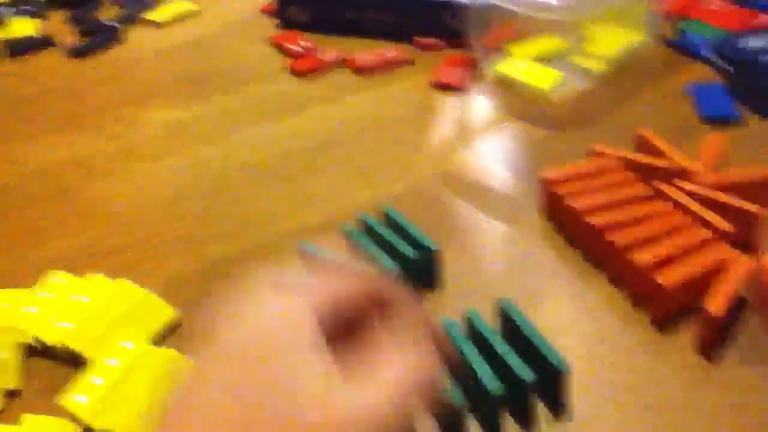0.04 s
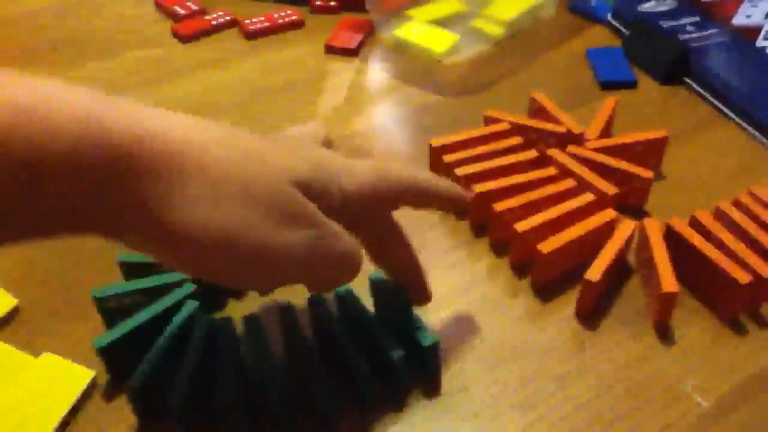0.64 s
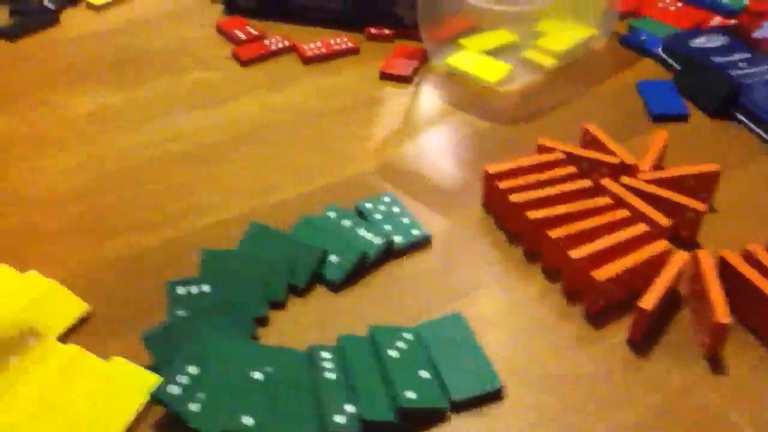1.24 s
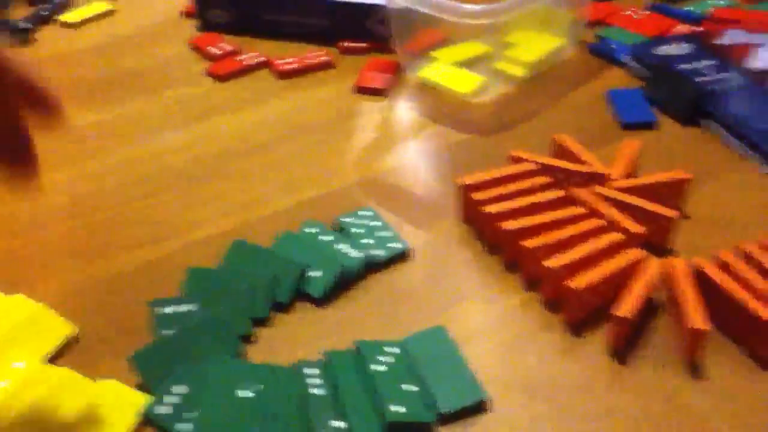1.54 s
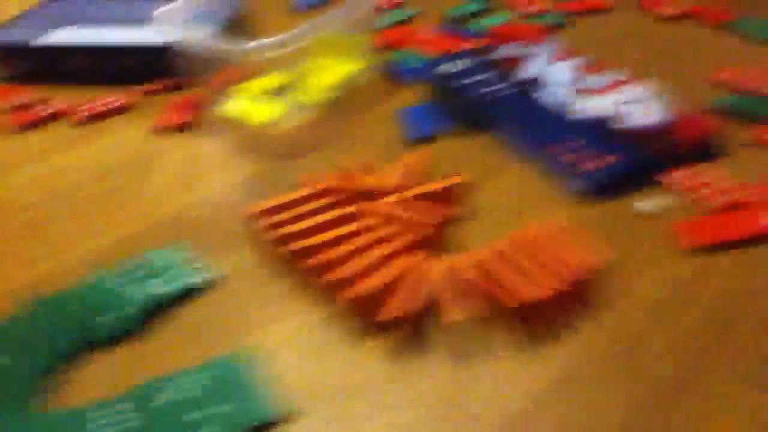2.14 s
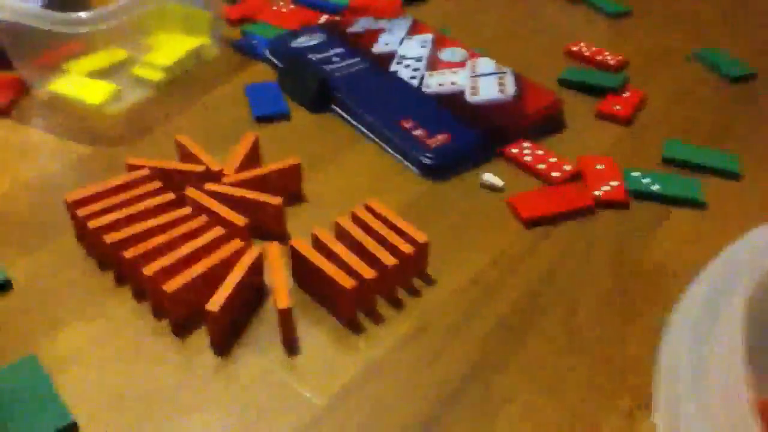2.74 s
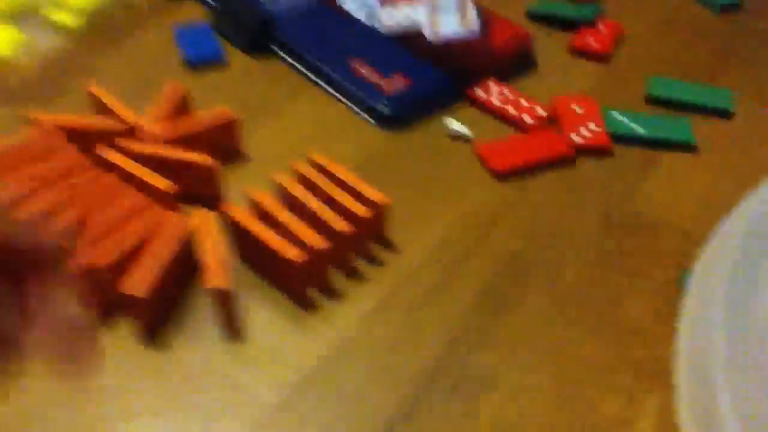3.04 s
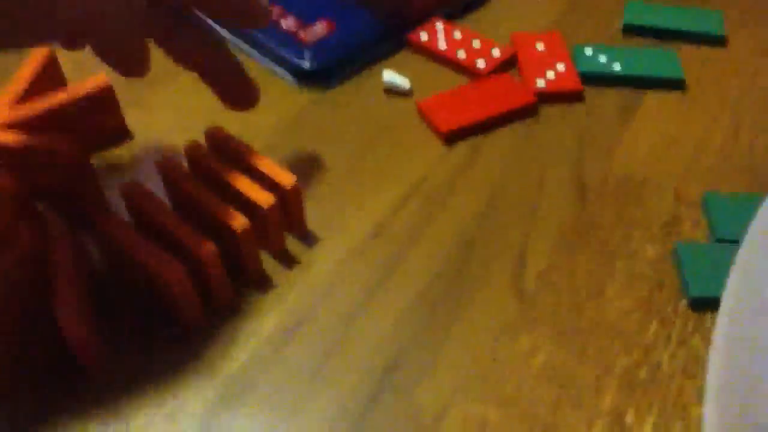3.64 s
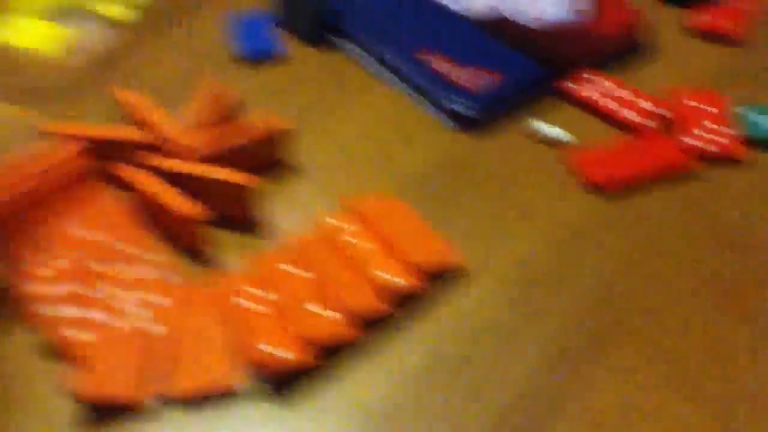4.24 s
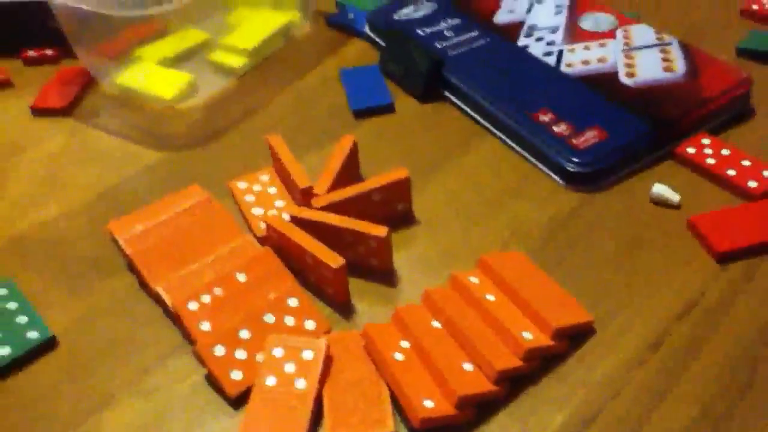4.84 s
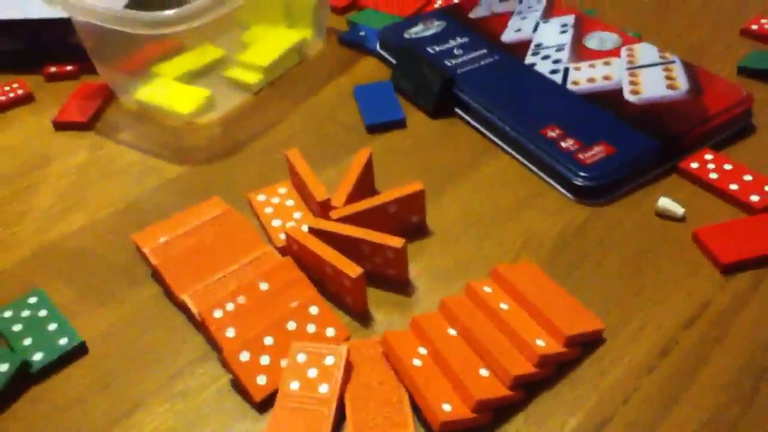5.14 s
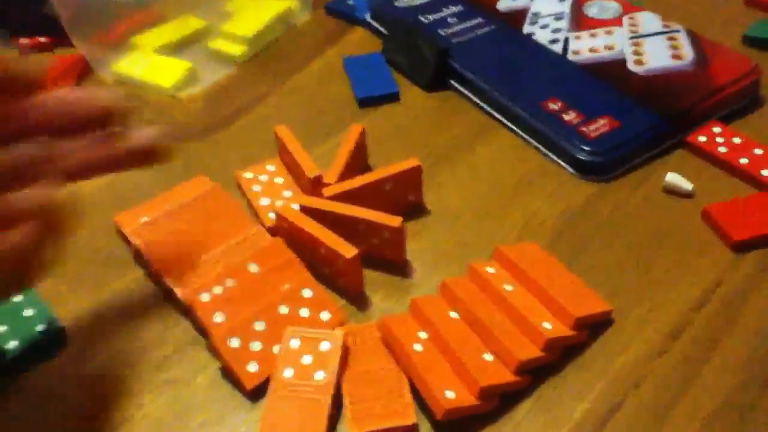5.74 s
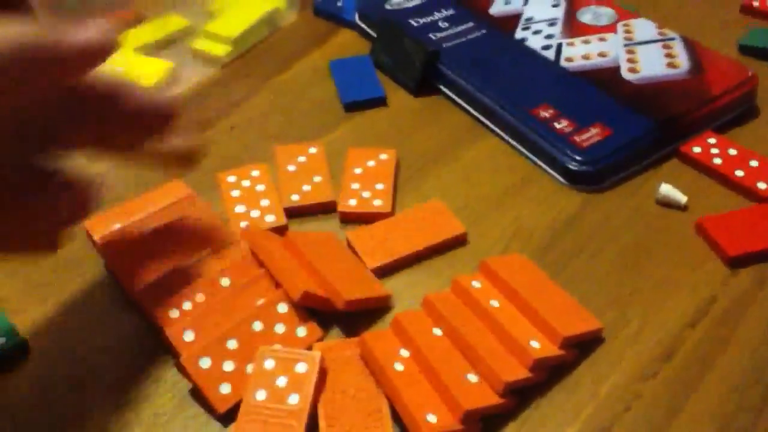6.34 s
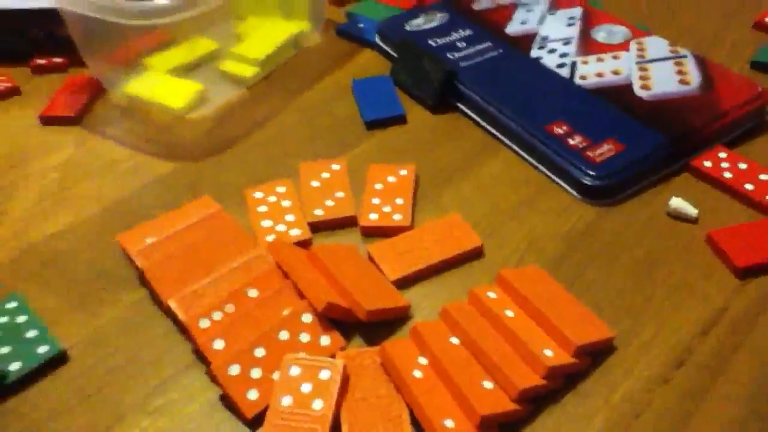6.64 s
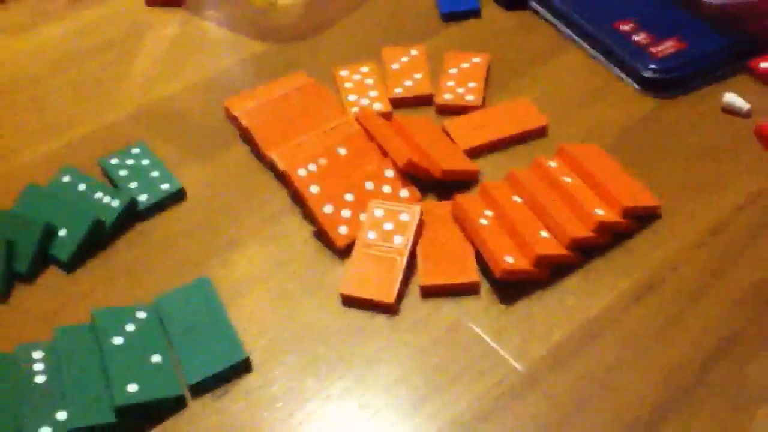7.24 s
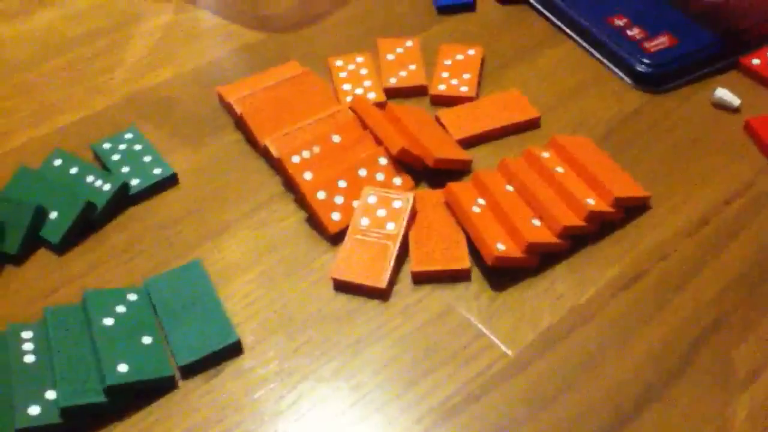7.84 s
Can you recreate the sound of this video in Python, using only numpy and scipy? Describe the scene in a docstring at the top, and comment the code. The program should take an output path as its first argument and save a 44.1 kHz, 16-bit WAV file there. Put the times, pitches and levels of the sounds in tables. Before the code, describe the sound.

Three short bursts of falling dominoes clack on a wooden tabletop, close up in a small, quiet room.

```python
"""Dominoes toppling on a wooden table

A small room, a hand-held microphone close to the table. Plastic dominoes fall in three runs: each tile
clacks on its neighbour and knocks the table top, and the leaning stack chatters as it sinks. Between
the runs come light ticks, scuffs and dull bumps, over low room tone. The recorder's gain control ducks
on the hardest clack and recovers slowly."""
import sys
import numpy as np
from scipy import signal
from scipy.fft import rfft, irfft
from scipy.io import wavfile
from scipy.ndimage import uniform_filter1d

SR = 44100
rng = np.random.default_rng(int(sys.argv[2]) if len(sys.argv) > 2 else 0)


def unload_wav(signal):
    """Save mono or channel-first audio to the path in sys.argv[1] as 16-bit WAV at rate SR, clipped to [-1, 1]."""
    wavfile.write(
        sys.argv[1],
        SR,
        np.round(np.clip(np.atleast_2d(signal).T, -1, 1) * 32767).astype(np.int16),
    )


N = 352343
TIME = np.arange(N) / SR
HIT = TIME[:int(.12 * SR)]  # time axis of one blow
ATTACK = int(.004 * SR)
TOP_HZ, MEDIUM_DB = 16200, -31  # the recorder's top cut; a blow of medium force

# Clear tile strikes, close to the microphone: t/s, level/dB, clack f/Hz, relative edge level/dB
STRIKES = [(0.8368, -26, 6440, -14.5), (0.847, -26, 3390, -11), (0.8682, -34, 3950, -24),
           (0.8717, -35.5, 3400, -18), (0.8855, -28.5, 6300, -19), (0.8919, -24.5, 3360, -20),
           (0.904, -39, 6400, -26), (0.9224, -22, 6900, -8.5), (0.932, -28, 7000, -3),
           (0.9369, -18.5, 7040, -7), (0.9564, -17.5, 5700, -10), (0.9724, -18, 6230, -8),
           (0.981, -21.5, 4100, 0), (0.9834, -22, 3930, -1), (0.9933, -24.5, 4000, -3.5),
           (0.9978, -29, 6500, -17), (1.0064, -17.5, 6100, -9.5), (1.018, -28.5, 4200, -1.5),
           (1.0344, -25.5, 6540, -8), (1.0464, -47, 3950, -11.5), (1.067, -43.5, 3430, -5.5),
           (1.1, -37, 4230, -2), (1.124, -32.5, 4060, -16), (1.1328, -28.5, 4800, -10),
           (1.162, -17.5, 6800, -1), (1.1853, -25.5, 6510, 2), (1.1958, -23, 3440, -1.5),
           (1.2049, -32, 6000, -11), (1.2354, -23, 3250, -10), (1.238, -29, 7140, -1),
           (1.241, -18.5, 7500, -9), (1.2455, -27, 7500, -8), (1.2554, -10.5, 4220, -6),
           (1.2589, -22, 3450, 1), (1.263, -21.5, 4360, -3), (1.2649, -20, 3500, -5),
           (1.2764, -27, 3600, -3), (2.2674, -42, 4450, -16), (2.2993, -46, 4700, -25),
           (2.348, -39, 4500, -13), (2.378, -39, 4230, -3), (2.402, -38.5, 5770, -0.5),
           (2.406, -37.5, 5940, -18), (2.449, -35.5, 4600, -2), (2.476, -41.5, 7900, 5),
           (3.0631, -34, 4120, -10.5), (3.081, -48, 4250, -28.5), (3.1024, -38, 3950, -13),
           (3.114, -51, 4300, -24), (3.2526, -45.5, 3830, -18), (3.296, -45.5, 5400, -10),
           (3.608, -27.5, 4500, -10.5), (3.78, -42, 4230, -12), (3.796, -48, 4660, -6),
           (3.7996, -12.5, 5570, -18), (3.8366, -28.5, 5540, -22), (3.9111, -27, 7360, -1),
           (3.9212, -27.5, 7000, -8), (3.9388, -49, 6000, -8), (3.9689, -31, 6600, -2.5),
           (3.982, -44, 7000, -10.5), (4.0412, -20.5, 6500, -3), (4.0453, -20, 4080, -4.5),
           (4.0579, -25.5, 3850, -19.5), (4.0679, -26.5, 6700, -2), (4.072, -11, 6700, -4),
           (4.086, -34.5, 6500, -7.5), (4.0953, -13, 7100, -2.5), (4.1064, -18, 6500, -6.5),
           (4.113, -20, 4080, -12), (4.1237, -21, 6630, -2.5), (4.175, -31.5, 4200, 8.5),
           (4.1956, -34, 5500, 1.5), (4.205, -22.5, 4270, -8.5), (4.2087, -24.5, 6200, 4.5),
           (4.2196, -27, 6000, -9), (4.229, -31, 5000, -6), (4.234, -25, 6760, -0.5),
           (4.2393, -16.5, 5850, -6), (4.247, -36.5, 6980, -4), (4.2594, -28, 6490, -9.5),
           (4.285, -46, 5330, -7), (4.3353, -22, 3350, -8), (4.3433, -32.5, 3600, -17.5),
           (4.3494, -34, 3430, -22), (4.3655, -17, 4900, -8.5), (4.3741, -21.5, 3600, -5.5),
           (4.3866, -23, 3420, -15.5), (4.3891, -16.5, 3160, -9.5), (4.4038, -19.5, 3460, -5.5),
           (4.4103, -25, 3220, -4.5), (4.4196, -19.5, 3330, -11), (4.4258, -33, 3580, -16.5),
           (4.439, -40, 3530, -19.5), (4.4702, -42.5, 4340, -12.5), (4.479, -30, 3960, -15.5),
           (4.4898, -26, 5190, -3), (4.4944, -1.5, 4460, -14.5), (4.5105, -29.5, 4700, -0.5),
           (4.712, -35.5, 3330, -12), (4.7297, -32.5, 3420, -17), (4.746, -44, 3600, -20),
           (4.762, -11.5, 4260, -22.5), (4.776, -35, 5700, -18), (4.7919, -31, 3700, -25),
           (6.109, -36.5, 3280, -10), (6.183, -37.5, 5200, -8), (6.1968, -37, 6000, -2),
           (6.232, -31.5, 3200, -19), (6.237, -30, 5050, -10), (6.2437, -28.5, 5900, -14),
           (6.2505, -32, 5000, -17), (6.2603, -31, 5000, -20), (6.2826, -30.5, 7000, -11),
           (6.268, -30, 7250, -10), (6.2983, -31, 5950, -16), (6.313, -42, 6120, 5),
           (6.331, -15.5, 6200, -6.5), (6.3321, -27, 7200, -4), (6.3346, -22, 4590, -12),
           (6.3443, -32, 6300, -13), (6.393, -39, 3250, -18)]
def dominoes():
    """Tiles strike in turn; harder blows put more into the crack and less into the ring and the table."""
    out = np.zeros((2, N))
    for (s, db, pitch_hz, edge_db), detune in zip(STRIKES, rng.uniform(-1, 1, len(STRIKES))):
        ring_hz, twist_hz, ring_db, ring_t60, top_hz, knock_db, boom_db, woody_db = group_at(s)
        force_db = db - MEDIUM_DB
        knock_db -= 0.4171 * force_db
        ring_db -= 0.3039 * force_db + 2.5 * np.log2(pitch_hz / ring_hz)  # bright strikes ring less too
        # a low, flat clack rings on at its own pitch; a bright one leaves the usual ring of its row
        own_hz = pitch_hz if pitch_hz < 4500 else ring_hz * (1 + 0.015 * detune)
        tile = clack(pitch_hz, edge_db, top_hz, knock_db, boom_db, woody_db,
                     own_hz, twist_hz, ring_db, ring_t60)
        add(out, s, undb(db) * tile)
    return out


# Groups of tiles along the table, levels relative: from t/s, ring f/Hz, twisting mode f/Hz,
# ring level/dB, ring t60/s, top of the edge snap f/Hz, knock level/dB, boom level/dB, woody level/dB
TILE_GROUPS = [(0.8, 3955, 3230, 0.5, 0.034, 16000, -3, -5.5, 5),
               (1.11, 3570, 3140, -0.5, .016, 13600, -0.5, -3, 3),
               (2.2, 4500, 3850, -4.5, .006, 10800, -4, 11, -11),
               (3.0, 4360, 4430, 0.5, 0.014, 13000, -3.5, 11, -11),
               (3.5, 4500, 3900, -1.5, .007, 15000, -1, 11, -2),
               (3.75, 4070, 3830, -1, .008, 13000, 3.5, 2.5, 1),
               (3.9, 4124, 4080, -0.5, 0.022, 15300, -4.5, 1, -4.5),
               (4.15, 4250, 3600, -2, .022, 12800, -3.5, 4, 2.5),
               (4.32, 3260, 3610, 2, 0.023, 12600, -5, 0.5, 6),
               (4.485, 4490, 4000, 1.5, .012, 12600, -1, -3, 7),
               (4.7, 3420, 3600, 4.5, .025, 11300, 2.5, 3, 0),
               (4.755, 3600, 3300, -29, .012, 11000, 4, -3, 3.5),
               (6.1, 3240, 3600, 3.5, 0.028, 12000, 0, -1.5, 3),
               (6.16, 2630, 3450, -1, 0.023, 12400, -1, -2, -1),
               (6.32, 2700, 4400, -3.5, .012, 12800, -1, 0, 0.5)]
def group_at(s):
    """Ring, edge and table colour of the tiles falling at time s: those that lie together sound alike."""
    return TILE_GROUPS[sum(s >= group[0] for group in TILE_GROUPS[1:])][1:]


# Modes of a plastic tile: multiple of the ring pitch, relative level/dB, share of the ring t60
TILE_MODES = [(1.001, -3, 1), (1.46, -10, 0.53), (2.06, -15, 0.72)]
def clack(pitch_hz, edge_db, top_hz, knock_db, boom_db, woody_db, ring_hz, twist_hz, ring_db, ring_t60):
    """Crack, edge snap, table knock and ring of one strike, as (towards the microphone, into the room)."""
    push = crack(snap_db=0, snap_t60=.007, tail_db=-11, tail_t60=.026)
    # a sharp corner excites a wide range of modes, a flat face only those near the pitch and none high up
    width_hz = np.interp(edge_db, [-16, 0], [1000, 2800])
    contact = signal.butter(6, np.interp(edge_db, [-26, -12], [6900, 9500]), fs=SR, output="sos")
    resonance = signal.lfilter(*signal.iirpeak(pitch_hz, pitch_hz / width_hz, fs=SR), push)
    body = strike(signal.sosfilt(contact, band(resonance, 2700, 9300)), 0)
    snap = crack(snap_db=7, snap_t60=.006, tail_db=0, tail_t60=.022)
    edge = strike(band(snap, 7100, top_hz), edge_db + 0.5)
    knock = table_knock(knock_db, boom_db, woody_db)
    # the neighbours that lean on a tile damp it, a little differently at every strike
    held_t60 = ring_t60 * (1 + 0.35 * rng.uniform(-1, 1))
    modes = [(ring_hz * ratio, db, held_t60 * share) for ratio, db, share in TILE_MODES]
    tone = strike(ring(modes + [(twist_hz, -8.5, held_t60)], scatter=0.014), ring_db - 0.5)
    direct = body * np.sqrt(1 - .8 * undb(2 * np.minimum(ring_db, 0))) + tone
    # each mode beams its own way; the walls get all of them, so their share is broad and even
    broad = signal.sosfilt(contact, band(1. * (HIT == 0), 2660, 7900))
    outward = strike(broad, -3.9) + undb(-5.5) * tone
    return np.array([direct, outward]) + edge + knock


def crack(snap_db, snap_t60, tail_db, tail_t60):
    """A hard contact: a sharp pulse, a snap of heavily damped modes, a short tail from surfaces close by."""
    snap, tail = rng.standard_normal((2, len(HIT)))
    pulse = strike(1. * (HIT == 0), 0)
    dying = fade(HIT, snap_t60)
    return pulse + strike(snap * dying, snap_db) + strike(tail * fade(HIT, tail_t60) * (1 - dying), tail_db)


# Modes of the wooden table top: f/Hz, relative level/dB, t60/s
TABLE_MODES = [(247, -21, 0.13), (274, -10.5, 0.074), (336.6, -6, 0.056), (372, -8, 0.04),
               (493, -23, 0.013), (634, -0.5, 0.018), (924, -7, 0.039), (1090, -7, 0.035),
               (1393, -4, 0.024), (1532, -2, 0.03), (1718, -2.5, 0.028), (2055, -4.5, 0.037),
               (2220, -1.5, 0.025), (2455, -8, 0.059)]
def table_knock(knock_db, boom_db, woody_db):
    """A tile thumps the table top, which rings with a low boom and a woody middle."""
    thump = band(crack(snap_db=4, snap_t60=0.016, tail_db=-3, tail_t60=0.053), 1134, 3300)
    modes = [(hz, db + boom_db * (hz < 700) + woody_db * (1350 < hz < 1650), t60)
             for hz, db, t60 in TABLE_MODES]
    wood = band(ring(modes, scatter=0.022), 160, 4800)
    return strike(thump, knock_db - 6.5) + strike(wood, knock_db - 4.5)


# Leaning stacks sinking on the table: t/s, rise/s, hold/s, rebound level/dB
COLLAPSES = [(0.866, 0.095, 0.061, -31.5), (1.102, 0.022, 0.13, -37), (1.254, 0.0045, 0.0099, -43.5),
             (3.797, 0.0034, 0.026, -46), (4.039, 0.0098, 0.06, -30.5), (4.158, 0.018, 0.038, -34.5),
             (4.326, 0.031, 0.051, -35.5), (6.11, 0.0037, 0.032, -48), (6.168, 0.037, 0.068, -37.5),
             (6.34, 0.0037, 0.013, -48.5), (6.39, .004, 0.0072, -55.5)]
def chatter(count, spread_db, edge_db, pitch_hz, settle_s):
    """Small, duller rebounds along each sinking stack, with more knock and less ring."""
    out = np.zeros((2, N))
    for s, rise_s, hold_s, db in COLLAPSES:
        ring_hz, twist_hz, ring_db, ring_t60, top_hz, knock_db, boom_db, woody_db = group_at(s + rise_s)
        gap_s = (rise_s + hold_s + settle_s) / count
        for k, (late, size, pitch, detune) in enumerate(rng.uniform(-1, 1, (count, 4))):
            t = gap_s * (k + (1 + late) / 2)
            tile = clack(pitch_hz * (1 + .3 * pitch), edge_db, top_hz, knock_db + 3.5, boom_db, woody_db,
                         ring_hz * (1 + 0.03 * detune), twist_hz, ring_db - 6, ring_t60)
            gain = undb(db + spread_db * size) * swell(t, rise_s, hold_s, fall_db_per_s=208.5)
            add(out, s + t, tile * gain)
    return out


# Soft bumps on the table, near the microphone: t/s, level/dB
BUMPS = [(1.2344, -31.5), (2.084, -38), (2.354, -37.5), (2.378, -36.5), (2.392, -45), (2.4004, -30.5),
         (2.406, -39), (2.449, -29.5), (3.064, -43.5), (3.184, -36), (3.197, -37.5), (3.2527, -23),
         (3.269, -41), (3.2962, -22.5), (3.312, -33), (3.325, -37), (3.3548, -29.5), (3.608, -34.5),
         (3.697, -38.5), (3.779, -31), (3.7884, -28), (6.1964, -27.5), (6.335, -34)]
def bumps(thud_hz, tick_hz, db_per_octave):
    """A soft push bends the table top for a cycle or two; harder contacts let more of its ring through."""
    out = np.zeros(N)
    for s, db in BUMPS:
        bright_hz = 1070 * 2 ** ((db - MEDIUM_DB) / db_per_octave)
        place = 1 + 0.087 * rng.uniform(-1, 1)
        thud = strike(np.sin(2 * np.pi * thud_hz * place * HIT) * fade(HIT, t60=0.007), 0)
        wood = strike(ring(TABLE_MODES, scatter=0.064), -4)
        tick = strike(np.sin(2 * np.pi * tick_hz * HIT) * fade(HIT, t60=0.0012), -1)
        soft = signal.sosfilt(signal.butter(2, bright_hz, fs=SR, output="sos"), thud + wood - tick)
        add(out, s, strike(band(band(soft, 270, 7000), 170, 6000), db))
    return out


# Tiles skidding or nudged along the table: t/s, rise/s, hold/s, fall/(dB/s), level/dB, low f/Hz, high f/Hz
SKIDS = [(2.31, .06, 0.038, 202, -49, 402, 716), (2.467, 0.0024, 0.0064, 600, -42, 6950, 11000),
         (2.5, 0.13, 0.32, 120, -63.5, 1960, 2410), (2.479, .03, 0.19, 43, -64, 4040, 4670),
         (2.78, 0.0043, 0.0066, 600, -46.5, 750, 7000), (2.832, .005, 0.0066, 600, -47.5, 700, 5500),
         (3.257, .005, .075, 200, -40.5, 370, 620), (3.7945, .003, 0.035, 230, -34.5, 4880, 12400)]
def skids(grain_db):
    """Sliding tiles: the fine grain of the table makes them rasp; pressed down by a hand they rub low."""
    out = np.zeros(N)
    t = TIME[:SR]
    for s, rise_s, hold_s, fall, db, lo_hz, hi_hz in SKIDS:
        roughness = undb(grain_db * grain(t, step=40))
        rasp = band(rng.standard_normal(len(t)) * roughness, lo_hz, hi_hz)
        add(out, s, level(rasp, db) * swell(t, rise_s, hold_s, fall))
    return out


# Hand movements close by: t/s, rise/s, hold/s, level/dB
RUSTLES = [(2.159, 0.11, 0.043, -48.5), (2.446, 0.17, 0.14, -57.5), (3.178, 0.2, .15, -44.5)]
# Spectrum of their rubbing: f/Hz, relative level/dB
RUSTLE_COLOUR = [(100, -4), (300, -4), (550, -1), (1000, -8.5), (2200, -9), (3000, -17), (4800, -9.5),
                 (7500, -17), (9800, -12), (16000, -38.5)]
def rustle(grain_db):
    """Faint, grainy rubbing as the hand moves to the next row."""
    rubbing = sum(undb(db) * swell(TIME - s, rise_s, hold_s, fall_db_per_s=44)
                  for s, rise_s, hold_s, db in RUSTLES)
    roughness = undb(grain_db * grain(TIME, step=300))
    return noise(RUSTLE_COLOUR, N) * rubbing * roughness


# The small room's reflections, heard at the table: f/Hz, relative level/dB
ROOM_COLOUR = [(100, -9), (245, 10.5), (345, 8), (480, -0.5), (900, 4.5), (1550, 0.5), (2600, 1), (4300, 5),
               (7000, -1.5), (10000, 1), (16000, -23)]
def room(x, wet_db, low_t60, high_t60, first_s):
    """Diffuse reflections from nearby things and walls; the treble dies sooner."""
    t = TIME[:SR // 2]
    wash = noise(ROOM_COLOUR, len(t))
    low = signal.sosfilt(signal.butter(1, 3000, fs=SR, output="sos"), wash)
    onset = np.clip(t / first_s - .5, 0, 1)
    tail = (low * fade(t, low_t60) + (wash - low) * fade(t, high_t60)) * onset
    return undb(wet_db) * signal.fftconvolve(x, tail / np.linalg.norm(tail))[:N]


# Room tone and microphone hiss: f/Hz, relative level/dB
ROOM_TONE = [(15, -47), (25, -16), (114, 1), (217, -4), (249, -3), (354, -9), (863, -18), (936, -19),
             (1020, -18.5), (1100, -19.5), (1840, -20.5), (7310, -22), (13600, -24), (14800, -31.5),
             (16000, -28)]
def background(floor_db, whine_hz, whine_db):
    """Low room rumble, microphone hiss and a thin electronic whine."""
    return undb(floor_db) * noise(ROOM_TONE, N) + level(np.sin(2 * np.pi * whine_hz * TIME), whine_db)


def ring(modes, scatter):
    """Damped modes; their strengths and signs depend on where the blow lands."""
    hz, db, t60 = np.transpose(modes)[:, :, None]
    size, sign, detune = rng.standard_normal((3, len(modes), 1))
    waves = np.sin(2 * np.pi * hz * (1 + scatter * detune) * HIT)
    return np.sum(undb(db + 2 * size) * np.sign(sign) * waves * fade(HIT, t60), axis=0)


def noise(colour, size):
    """Noise with a spectrum of (f/Hz, level/dB) points, rms 1."""
    hz, db = np.transpose(colour)
    bins = np.maximum(np.fft.rfftfreq(size, 1 / SR), 1)
    gain = undb(np.interp(np.log(bins), np.log(hz), db))
    return level(irfft(rfft(rng.standard_normal(size)) * gain, size), 0)


def grain(t, step):
    """A random curve with a new value every step samples."""
    return np.interp(t, t[::step], rng.standard_normal(len(t[::step])))


def swell(t, rise_s, hold_s, fall_db_per_s):
    """Gain that builds up by 18 dB, holds and dies away, t seconds after its start."""
    building = 18 * np.clip(1 - t / rise_s, 0, 1)
    dying = fall_db_per_s * np.maximum(t - rise_s - hold_s, 0)
    return (t >= 0) * undb(-building - dying)


def fade(t, t60):
    """Exponential decay, 60 dB down after t60."""
    return np.exp(-np.log(1000) * t / t60)


def band(x, lo_hz, hi_hz):
    """Causal band-pass."""
    return signal.sosfilt(signal.butter(3, [lo_hz, hi_hz], "band", fs=SR, output="sos"), x)


def undb(db):
    """Decibels to gain."""
    return 10 ** (np.asarray(db) / 20)


def level(x, db):
    """Scale to an rms level."""
    return x * undb(db) / np.sqrt(np.mean(x ** 2))


def strike(x, db):
    """Scale a blow so that its first 4 ms have this rms level."""
    return x * undb(db) / np.sqrt(np.mean(x[:ATTACK] ** 2))


def add(track, s, sound):
    """Mix a sound in at s seconds."""
    start = int(s * SR)
    track[..., start:start + sound.shape[-1]] += sound[..., :N - start]


def scene():
    """The table at one close microphone, with the walls' reflections behind it."""
    quiet = background(floor_db=-53.5, whine_hz=14994, whine_db=-72.5)
    scuffs = rustle(grain_db=1.5) + skids(grain_db=5)
    table = bumps(thud_hz=454, tick_hz=1375, db_per_octave=13.5)
    direct, outward = dominoes() + chatter(count=48, spread_db=5, edge_db=-16.5, pitch_hz=3600, settle_s=.075)
    reflections = room(outward + table, wet_db=-14, low_t60=0.38, high_t60=0.27, first_s=0.0022)
    return (direct + table + scuffs + reflections + quiet)[None]


def gain_control(x, ceiling_db, release_db_per_s):
    """The gain drops at once when the 2 ms level passes the ceiling, then creeps back."""
    power = np.maximum(uniform_filter1d(x ** 2, ATTACK // 2, axis=-1), 1e-12)
    over = np.maximum(10 * np.log10(power) - ceiling_db, 0)
    recovery = release_db_per_s * TIME
    return x * undb(recovery - np.maximum.accumulate(over + recovery, axis=-1))


def record(dry):
    """The recorder: gain control, full-scale clipping and a steep top cut."""
    held = np.clip(gain_control(dry, ceiling_db=-9.5, release_db_per_s=8), -1, 1)
    return signal.sosfilt(signal.ellip(10, .2, 80, TOP_HZ, fs=SR, output="sos"), held)


dry = scene()
out = record(dry)
unload_wav(out)
```